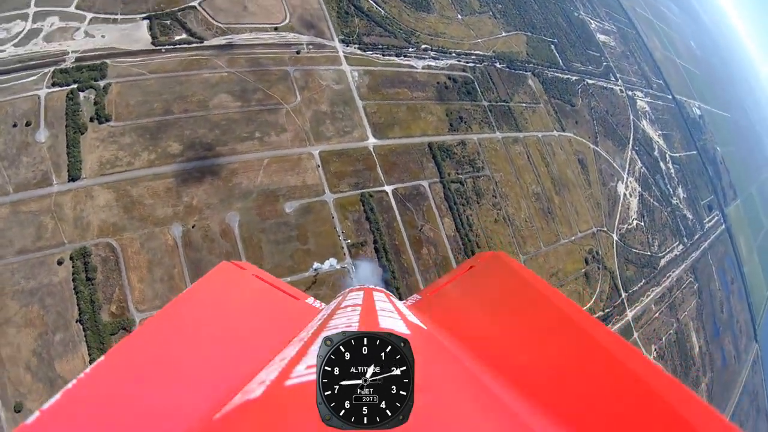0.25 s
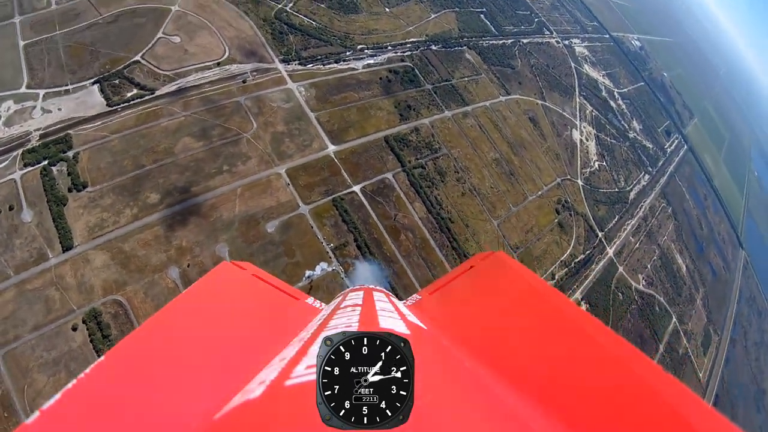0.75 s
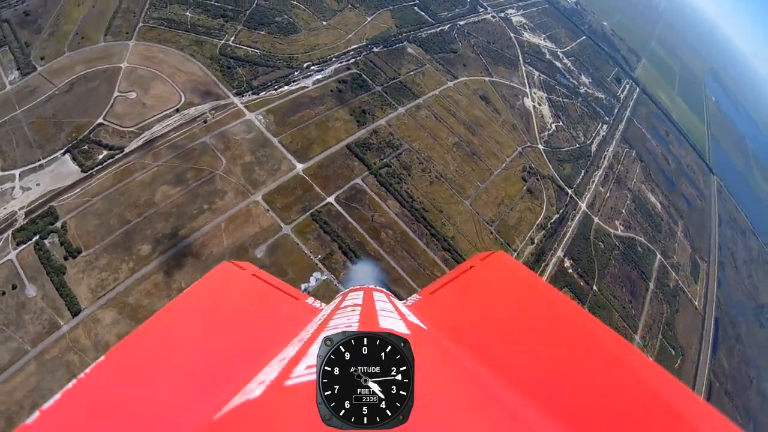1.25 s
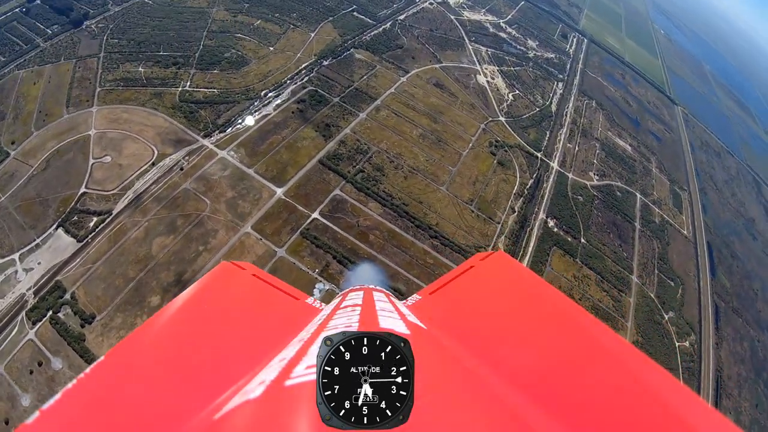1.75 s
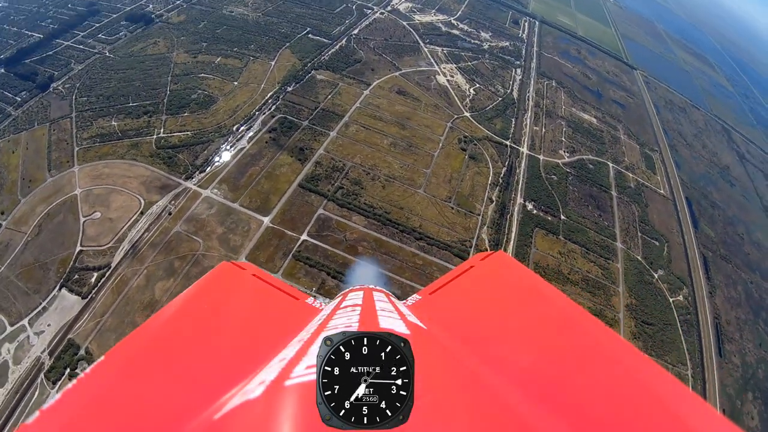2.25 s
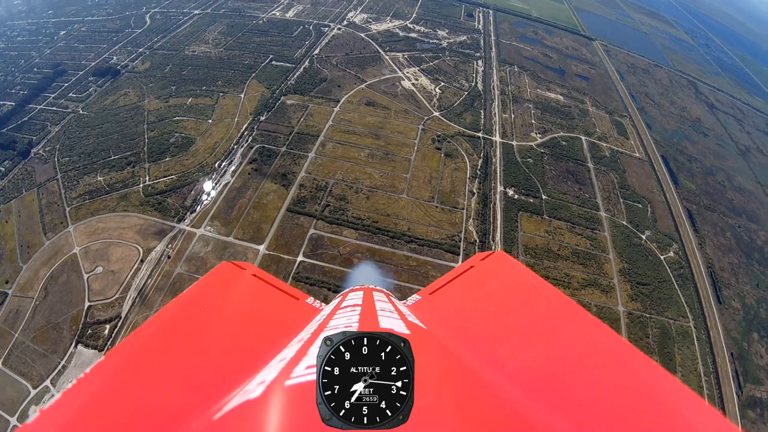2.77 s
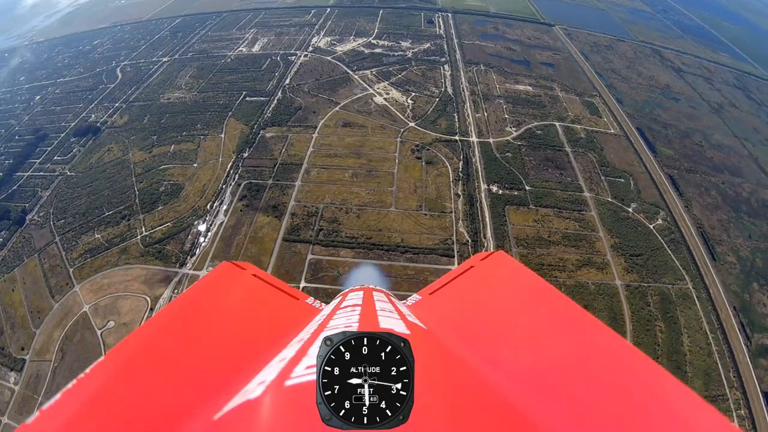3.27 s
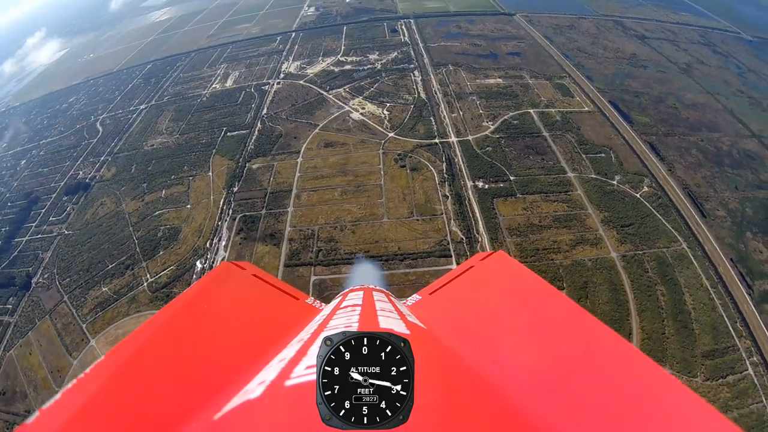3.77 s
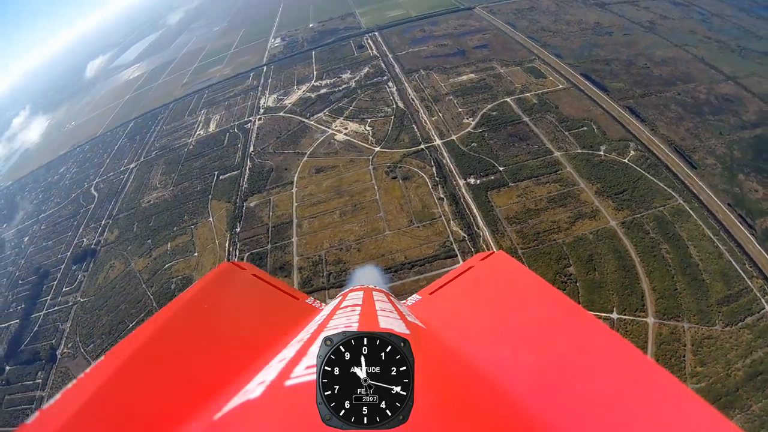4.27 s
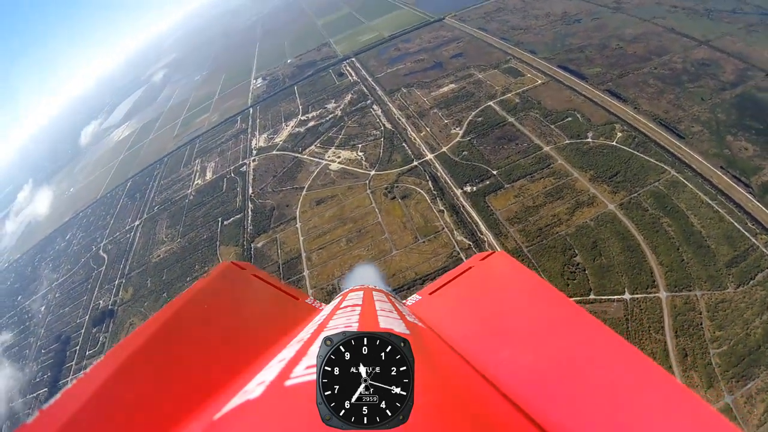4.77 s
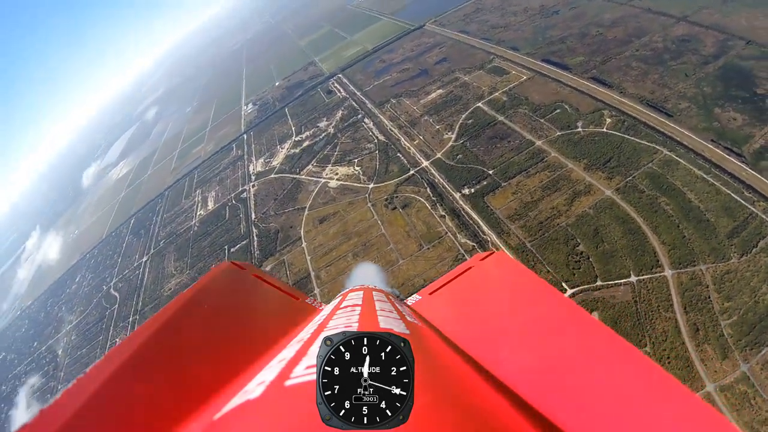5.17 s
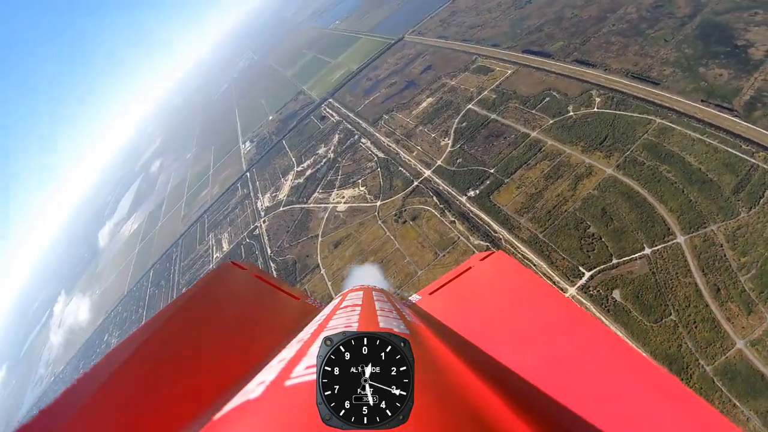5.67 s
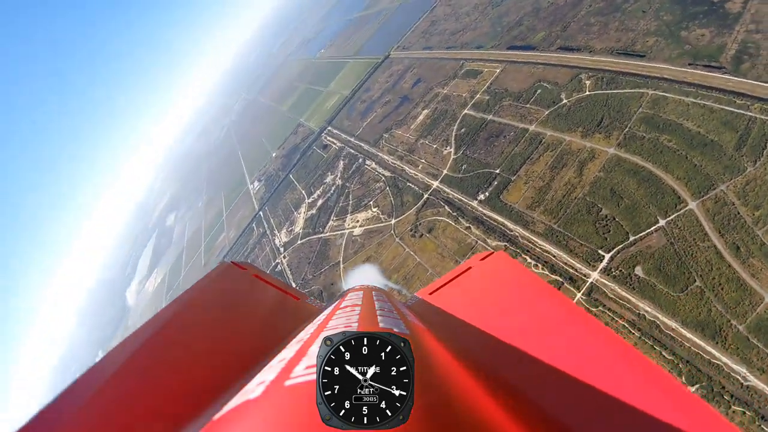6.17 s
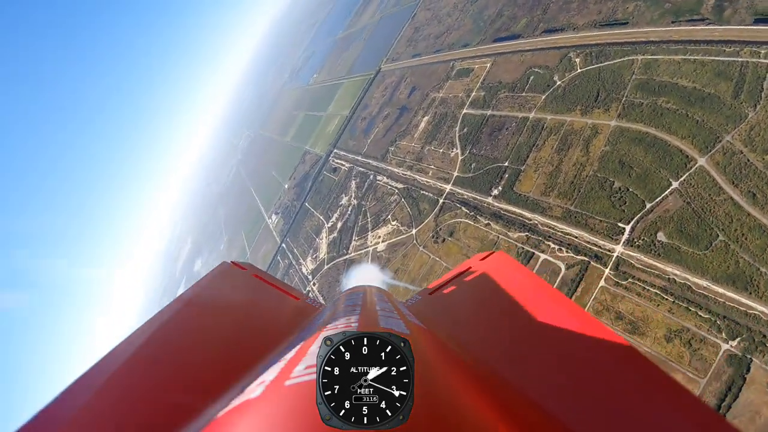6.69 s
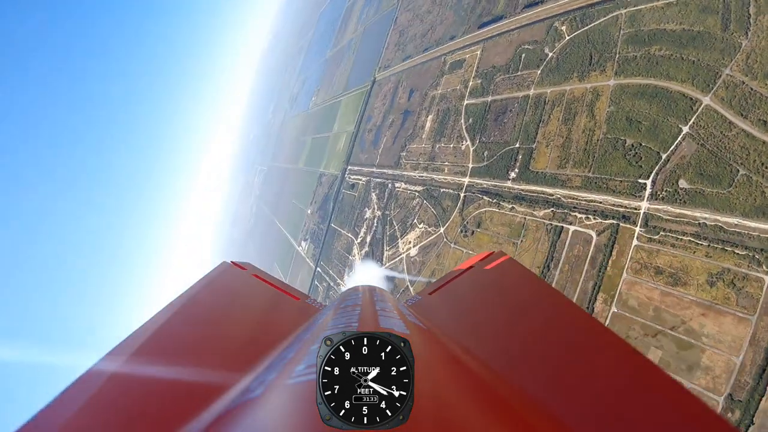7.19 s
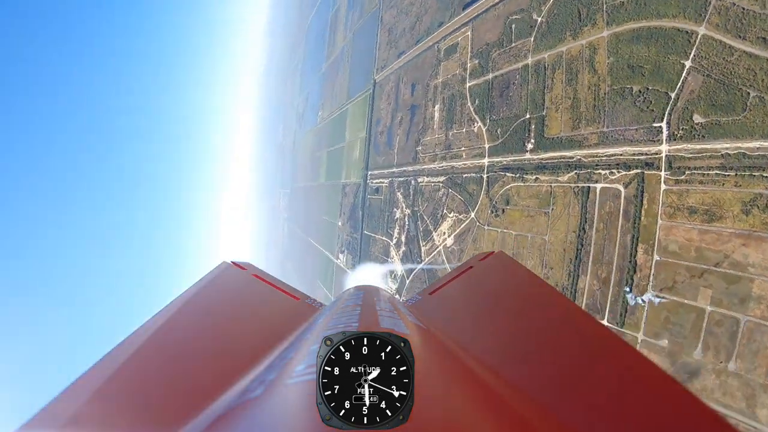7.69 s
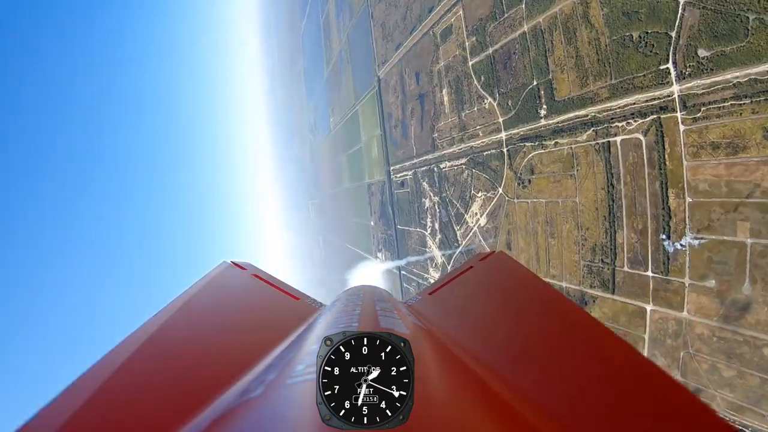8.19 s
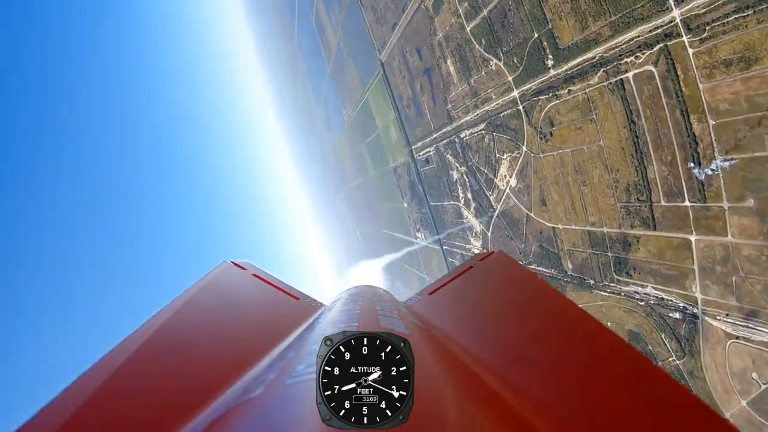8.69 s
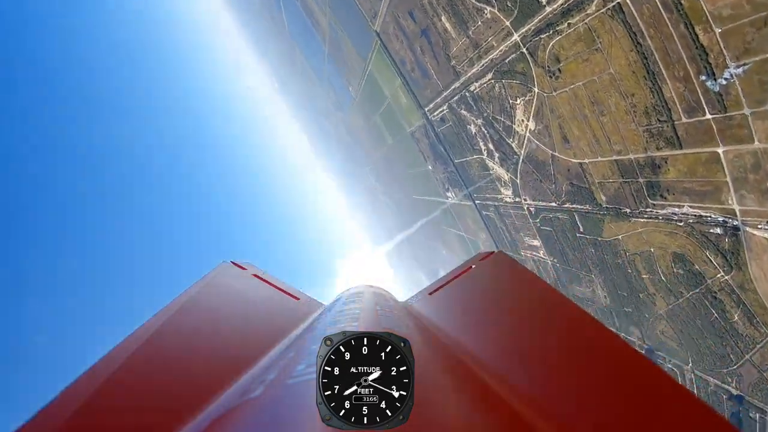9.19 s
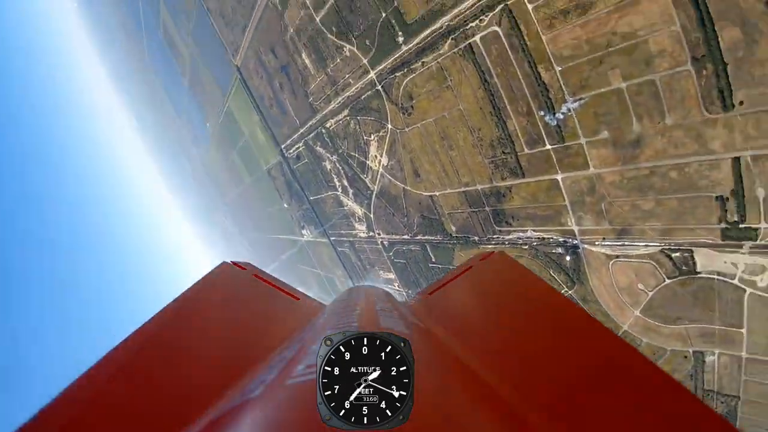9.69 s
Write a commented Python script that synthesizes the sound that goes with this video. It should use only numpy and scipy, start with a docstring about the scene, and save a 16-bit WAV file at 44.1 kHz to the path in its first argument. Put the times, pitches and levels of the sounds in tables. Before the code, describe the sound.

Loud motor roar, hiss and low wind buffeting surround a microphone mounted on a rocket in flight. As the air thins, the hiss fades and the buffeting turns to dry crackling and uneven puffs, then drops away. The roar continues, slightly weaker, until raspy sputters ring briefly through the hull among muffled gusts. Now and then the sound catches for an instant on a few tones.

```python
"""A motor roars and air hisses and buffets the microphone port: a rocket climbs, heard from its hull.
As the air thins, the turbulent buffeting crackles, breaks into separate puffs and stops, leaving a
thinner rush. At burnout the motor sputters in rasping bursts that excite the hull's resonances, and
dull gusts follow. Now and then the sound stutters: for an instant the treble drops out and the roar
freezes into a few tones."""
import sys
import numpy as np
from scipy import signal
from scipy.fft import rfft, irfft, next_fast_len
from scipy.io import wavfile
from scipy.ndimage import uniform_filter1d, minimum_filter1d, map_coordinates

SR = 44100
rng = np.random.default_rng(int(sys.argv[2]) if len(sys.argv) > 2 else 0)


def dump(signal):
    """Clip the signal to [-1, 1] and save it as 16-bit WAV at the path in sys.argv[1]."""
    limited = np.clip(np.atleast_2d(signal).T, -1, 1)
    pcm = np.round(limited * 32767).astype(np.int16)
    wavfile.write(sys.argv[1], SR, pcm)


N = 438354
T = np.arange(N) / SR


def amp(db):
    """The decibel scale: 20 dB is a factor of ten in amplitude."""
    return 10 ** (np.asarray(db) / 20)


def hold_and_fade(db, fade_s, fall_db_per_s):
    """Exponential decay: a level in dB holds, then sinks at a steady rate."""
    return db - fall_db_per_s * np.maximum(T - fade_s, 0)


def wobble(rate):
    """Slow random modulation: a spline through `rate` random values a second."""
    return map_coordinates(rng.standard_normal(8192), [T * rate], mode="wrap")


def bump(centre_s, width_s, steepness):
    """A generalised Gaussian pulse of height 1, its width taken at half height."""
    pulse = np.zeros(N)
    near = slice(*np.searchsorted(T, [centre_s - 3 * width_s, centre_s + 3 * width_s]))
    pulse[near] = .5 ** (np.abs(2 * (T[near] - centre_s) / width_s) ** steepness)
    return pulse


def filtered(x, response):
    """Linear filtering: the spectrum is multiplied by a frequency response."""
    size = next_fast_len(N + 8192)
    return irfft(rfft(x, size) * response(np.fft.rfftfreq(size, 1 / SR)), size)[:N]


def coloured(x, spectrum):
    """Spectral shaping by (frequency_hz, density_db) points on a log axis, scaled to rms 1."""
    points_hz, db = np.transpose(spectrum)
    shaped = filtered(x, lambda hz: amp(np.interp(np.log(hz + 1), np.log(points_hz), db)))
    return shaped / np.sqrt(np.mean(shaped ** 2) + 1e-20)


def turbulence(spectrum, eddy_rate, eddy_db):
    """Intermittency: flow noise arrives in eddies of random strength."""
    return coloured(rng.standard_normal(N) * amp(eddy_db * wobble(eddy_rate)), spectrum)


# gusts after burnout: centre_s, level_db, width_s
GUSTS = [(9.085, -18.5, 0.066), (9.257, -15.5, 0.28), (9.437, -15.5, 0.077), (9.506, -9.5, 0.024),
         (9.582, -19.5, 0.096), (9.706, -18, 0.13), (9.863, -12.5, 0.11)]
def gust_strength():
    """Superposition: the gusts add up to one amplitude envelope."""
    return sum(amp(db) * bump(s, width_s, steepness=2.7) for s, db, width_s in GUSTS)


# spectrum of the gusts: frequency_hz, density_db
GUST_SPECTRUM = [(30, -43), (100, -14), (220, -5), (400, 3), (600, 3.5), (950, -1.5), (1300, -16),
                 (2000, -38), (5000, -68)]
def gusts(gust):
    """Amplitude modulation: low-pitched flow noise swells into dull, uneven gusts."""
    return gust * turbulence(GUST_SPECTRUM, eddy_rate=98, eddy_db=1.5)


# spectra of the airstream's hiss and finest fizz: frequency_hz, density_db
HISS_SPECTRUM = [(1500, -31.5), (2800, 1.5), (3500, 3), (4300, 1), (5000, -2), (5500, -5), (6000, -12.5),
                 (6700, -21.5), (7300, -46.5), (9000, -72)]
FIZZ_SPECTRUM = [(6000, -45), (7300, 2.5), (9000, 3), (10500, -0.5), (12000, -2), (12700, -16),
                 (13700, -19.5)]
def airstream(gust):
    """Aerodynamic noise weakens with air density; it also dips during each gust."""
    duck_db = 7 * gust / (gust + amp(-15))
    dense_air = amp(hold_and_fade(-25, fade_s=2.52, fall_db_per_s=3.44))
    hiss_gain = np.hypot(dense_air, amp(-42))  # a floor remains in thin air
    fizz_gain = amp(hold_and_fade(-50.5, fade_s=0.68, fall_db_per_s=2.95))
    hiss = hiss_gain * turbulence(HISS_SPECTRUM, eddy_rate=370, eddy_db=-0.9)
    fizz = fizz_gain * turbulence(FIZZ_SPECTRUM, eddy_rate=300, eddy_db=0.7)
    return amp(-duck_db) * (hiss + fizz)


# envelope of the rasp along the skin: time_s, relative_level_db
RASP_ENVELOPE = [(0.0, -19.5), (3.18, -16.5), (3.23, -14), (3.31, -16), (4.81, -19), (4.91, -23.5),
                 (6.31, -24), (6.64, -26.5), (9.0, -28)]
# its spectrum: frequency_hz, density_db
RASP_SPECTRUM = [(400, -40), (800, -3.5), (1250, 1.5), (1600, 1), (2000, 0), (2650, -2), (3100, -7.5),
                 (3700, -19), (5000, -30.5), (7000, -70)]
def skin_rasp():
    """Boundary-layer turbulence: air rasps along the rocket's skin."""
    level_db = np.interp(T, *np.transpose(RASP_ENVELOPE)) + 0.5 + 0.71 * wobble(25)
    return amp(level_db) * turbulence(RASP_SPECTRUM, eddy_rate=300, eddy_db=0.65)


# envelope of the crackle as the flow breaks up: time_s, level_db
CRACKLE_ENVELOPE = [(0, -26), (2.8, -31), (3.5, -24), (4.65, -14.5), (5.0, -19.5), (5.46, -20), (5.52, -39),
                    (6.5, -64)]
# spectrum of its pops: frequency_hz, density_db
POP_SPECTRUM = [(150, -26.5), (500, -9.5), (900, -3.5), (1300, -3), (1800, -6.5), (2600, -12),
                (3500, -29.5), (7000, -75.5)]
def crackle(pops_per_s, pop_s, scatter_db):
    """Irregular vortex shedding: small eddies tear off, each with a dry pop."""
    gap, size = rng.standard_normal((1500, 2)).T
    starts = (np.cumsum(np.exp(.45 * gap)) / pops_per_s * SR).astype(int)
    kicks = np.bincount(starts[starts < N], amp(scatter_db * size[starts < N]), N)
    t = np.arange(SR // 25) / SR
    pops = signal.fftconvolve(kicks, t * np.exp(-t / pop_s))[:N]
    level_db = np.interp(T, *np.transpose(CRACKLE_ENVELOPE))
    return amp(level_db) * coloured(pops * rng.standard_normal(N), POP_SPECTRUM)


def stray_puffs(count, start_s, puffs_per_s, fall_db_per_s):
    """Timing jitter: rows (centre_s, relative_level_db) of weak, uneven puffs that die away."""
    slip, size = rng.standard_normal((count, 2)).T
    after_s = (np.arange(count) + 0.31 * slip) / puffs_per_s
    return list(zip(start_s + after_s, -14.5 - fall_db_per_s * after_s + 3.2 * size))


# the loudest puffs of air on the port: centre_s, relative_level_db
PUFFS = [(4.983, -11), (5.06, -16), (5.13, -12), (5.211, -16), (5.283, -11), (5.309, -13), (5.353, -11),
         (5.412, -12), (5.46, -12), (5.474, -11), (5.664, -21), (5.737, -12), (5.807, -17), (5.831, -9),
         (5.875, -14), (5.923, -11.5), (5.974, -9), (6.157, -18), (6.26, -20), (9.067, -9.5), (9.088, -7.5),
         (9.308, -12.5), (9.335, -12.5), (9.377, 0.5), (9.5, -16), (9.68, -23), (9.727, -13.5),
         (9.859, -21.5), (9.927, -8)]
# spectrum of their swirl: frequency_hz, density_db
PUFF_SPECTRUM = [(15, -9), (50, -6), (300, 3), (700, -1.5), (1200, -1.5), (1900, -14), (3000, -23),
                 (5000, -49.5), (7000, -76)]
def puffs():
    """Pressure transients: a single eddy gives the port a low push and pull and a swirl of noise."""
    strays = stray_puffs(count=12, start_s=4.9, puffs_per_s=25, fall_db_per_s=4)
    pressure, swirl = np.zeros((2, N))
    for s, db in list(PUFFS) + strays:
        push = bump(s - .002, width_s=0.0028, steepness=1.5)
        pull = bump(s + .0037, width_s=0.0033, steepness=2)
        pressure += amp(db - 9) * (push - pull)
        swirl += amp(db + 1) * bump(s, width_s=0.011, steepness=5.9)
    return pressure + swirl * turbulence(PUFF_SPECTRUM, eddy_rate=300, eddy_db=4.5)


# spectrum of the wind on the port: frequency_hz, density_db
RUMBLE_SPECTRUM = [(15, -0.5), (35, 2.5), (150, 2.5), (280, 1.5), (500, -5), (1000, -9), (2500, -41.5),
                   (7000, -82.5)]
def buffeting(gust, separation_s, cut_s):
    """Turbulent pressure beats on the port until the flow separates; gusts bring back a faint rumble."""
    attached = np.clip((separation_s - T) / cut_s, 0, 1)
    flow = attached * amp(hold_and_fade(-17, fade_s=4.83, fall_db_per_s=22))
    strength = flow + amp(-74) + amp(-26.5) * gust
    return strength * turbulence(RUMBLE_SPECTRUM, eddy_rate=90, eddy_db=1.5)


# modes of the hull: pitch_hz, bandwidth_hz, relative_gain_db
HULL_MODES = [(1100, 41, 7), (1600, 40, -2), (1980, 27, -3.5), (2670, 61, -1.5), (3050, 56, 4.5),
              (3260, 51, -6.5), (4000, 49, -4)]
def hull_response(hz):
    """Modal resonance: the hull responds as a sum of damped oscillators."""
    return sum(amp(db) * 1j * hz * width / (pitch ** 2 - hz ** 2 + 1j * hz * width)
               for pitch, width, db in HULL_MODES)


# sputters of the dying motor: start_s, relative_level_db, hold_s
SPUTTERS = [(9.054, -20, 0.018), (9.079, -21, 0.012), (9.296, -15.5, 0.02), (9.351, -16, 0.022),
            (9.371, -22, 0.013), (9.716, -16.5, 0.0074), (9.919, -16, .024)]
# spectra of their rasp and treble spit: frequency_hz, density_db
SPUTTER_SPECTRUM = [(60, 6), (500, -0.5), (1100, -6), (2000, 8), (3000, -0.5), (4000, -21.5), (5400, -26.5),
                    (6800, -45), (7500, -43), (12000, -59), (13700, -80)]
SPIT_SPECTRUM = [(2000, -32), (3300, 3), (4300, -4), (5400, -12), (6800, -31), (10000, -33.5), (12500, -45),
                 (14000, -72)]
def sputters(attack_s, t60_s):
    """Forced vibration: each burst of gas cracks, rasps for a moment and leaves the hull ringing."""
    flare = np.zeros(N)
    for start_s, db, hold_s in SPUTTERS:
        start = round(start_s * SR)
        t = np.arange(N - start) / SR
        attack = 1 - np.exp(-(t / attack_s) ** 2)
        crack_db = 3 * np.exp(-t / 0.0059)
        decay_db = 60 * np.maximum(t - hold_s, 0) / t60_s
        flare[start:] += attack * amp(db + crack_db - decay_db)
    rasp = flare * turbulence(SPUTTER_SPECTRUM, eddy_rate=500, eddy_db=4)
    # square law: strong bursts spit more treble
    spit = amp(6.5) * flare ** 2 * turbulence(SPIT_SPECTRUM, eddy_rate=460, eddy_db=2)
    gas = rasp + spit
    return amp(-2) * gas + amp(6) * filtered(gas, hull_response)


# surges early in the burn: centre_s, boost_db
SURGES = [(.115, 4), (.336, 5.5), (.567, 4.5)]
# spectrum of the exhaust: frequency_hz, density_db
ROAR_SPECTRUM = [(20, -35), (45, -42.5), (65, -35.5), (100, -21), (160, -13), (260, -4.5), (400, 0.5),
                 (560, 1), (950, -1.5), (1300, -8.5), (2000, -26.5), (4000, -57), (7000, -74.5)]
def motor_roar():
    """Jet noise: the turbulent exhaust roars through the hull and fades as the air thins."""
    surge_db = sum(db * bump(s, width_s=.028, steepness=2.7) for s, db in SURGES)
    level_db = hold_and_fade(-16, fade_s=5.2, fall_db_per_s=1.44) + surge_db + 0.22 * wobble(14)
    return amp(level_db) * turbulence(ROAR_SPECTRUM, eddy_rate=220, eddy_db=0.78)


def strongest_tones(piece, edge_hz, span_bins):
    """Fourier analysis: local spectral peaks below the edge are held as steady tones."""
    spectrum = rfft(piece)
    hz = np.fft.rfftfreq(len(piece), 1 / SR)
    is_peak = np.abs(spectrum) >= -minimum_filter1d(-np.abs(spectrum), span_bins)
    return irfft(spectrum * is_peak / (1 + (hz / edge_hz) ** 16), len(piece))


# stutters in the sound: centre_s, width_s
STUTTERS = [(.123, .014), (.337, .012), (.571, .014), (.848, .012), (1.007, .024), (1.146, .013),
            (1.999, .014), (2.255, .013), (2.362, .013), (3.237, .013), (3.280, .012), (4.112, .012),
            (4.623, .012), (5.178, .012), (5.518, .013), (5.937, .023), (6.862, .012), (7.205, .014),
            (7.311, .012), (7.802, .012), (8.058, .012), (8.719, .012), (8.816, .025), (8.870, .012),
            (8.976, .012), (9.672, .012), (9.873, .018)]
def stutter(x, crossover_hz, usual_width_s, window_samples):
    """Band splitting: the bass carries on while the treble briefly gives way to its strongest tones."""
    bass = filtered(x, lambda hz: 1 / (1 + (hz / crossover_hz) ** 6))
    treble = x - bass
    for s, width_s in STUTTERS:
        centre = round(s * SR)
        near = slice(centre - window_samples // 2, centre + window_samples // 2)
        stretch = width_s / usual_width_s  # longer gaps are deeper and bridged by lower tones
        dip_db = 18 * stretch ** 1.5 * bump(s, width_s, steepness=2.4)[near]
        tones = strongest_tones(treble[near], edge_hz=3000 / stretch ** 0.39, span_bins=23)
        bridge = amp(7.5) * bump(s, 1.46 * width_s, steepness=6.1)[near]
        treble[near] = amp(-dip_db) * treble[near] + bridge * tones
    return bass + treble


def scene():
    """Superposition: the pressures of motor and airstream add at one microphone, and the sum stutters."""
    gust = gust_strength()
    sound = motor_roar() + skin_rasp() + airstream(gust)
    sound += buffeting(gust, separation_s=5.485, cut_s=.01) + puffs()
    sound += crackle(pops_per_s=75, pop_s=0.0015, scatter_db=4.5)
    sound += gusts(gust) + sputters(attack_s=0.0017, t60_s=0.029)
    return stutter(sound, crossover_hz=1140, usual_width_s=.013, window_samples=2560)[None]


# narrow bands that the camera loses: centre_hz, bandwidth_hz
NOTCHES = [(762, 35), (7100, 140)]
def notch_response(hz):
    """Antiresonance: each notch filter cancels its centre frequency."""
    return np.prod([(centre ** 2 - hz ** 2) / (centre ** 2 - hz ** 2 + 1j * hz * width)
                    for centre, width in NOTCHES], axis=0)


def record(dry, ceiling=.93, limiter_samples=177, top_hz=13800):
    """Filtering and peak limiting: the camera loses two bands, tames the peaks and cuts the top treble."""
    notched = filtered(dry[0], notch_response)
    needed_gain = np.minimum(1, ceiling / (np.abs(notched) + 1e-9))
    held_gain = minimum_filter1d(needed_gain, limiter_samples)
    limited = notched * uniform_filter1d(held_gain, limiter_samples)
    return filtered(limited, lambda hz: hz < top_hz)[None]


dry = scene()
out = record(dry)
dump(out)
```